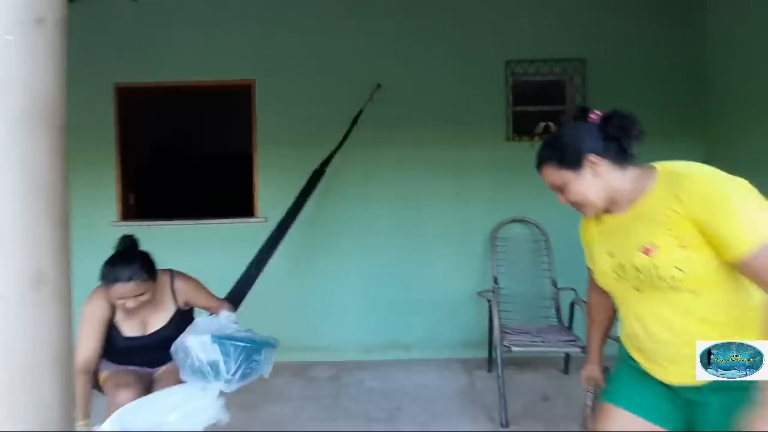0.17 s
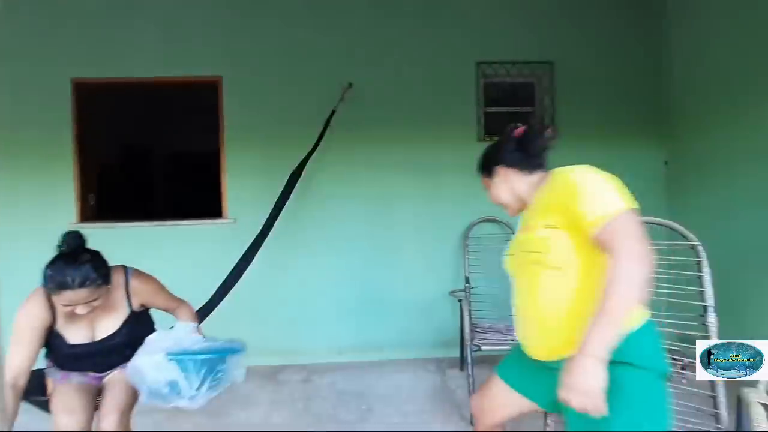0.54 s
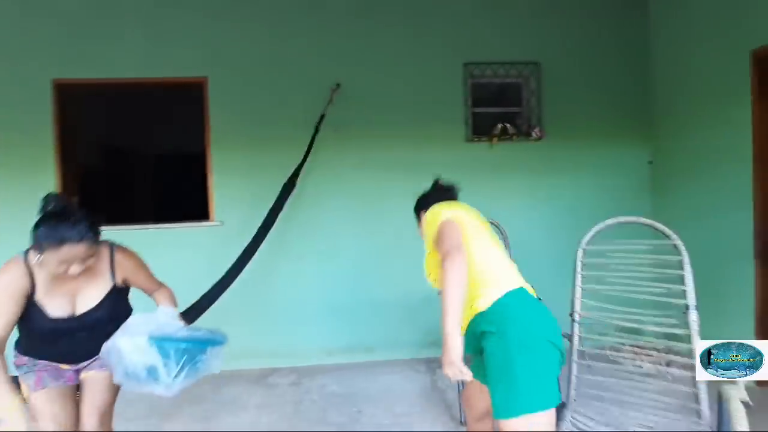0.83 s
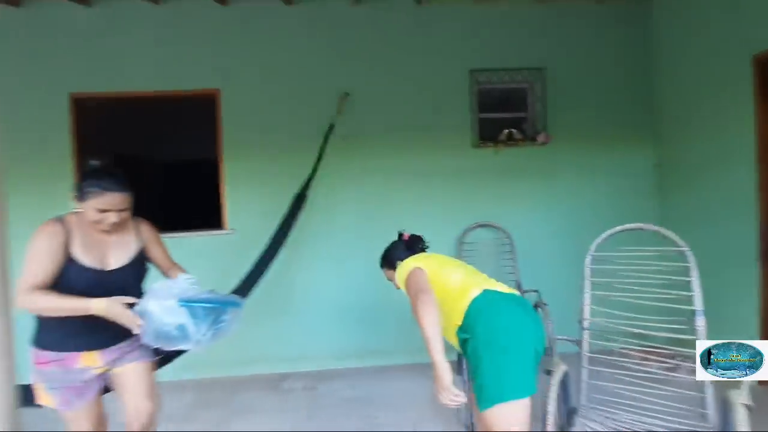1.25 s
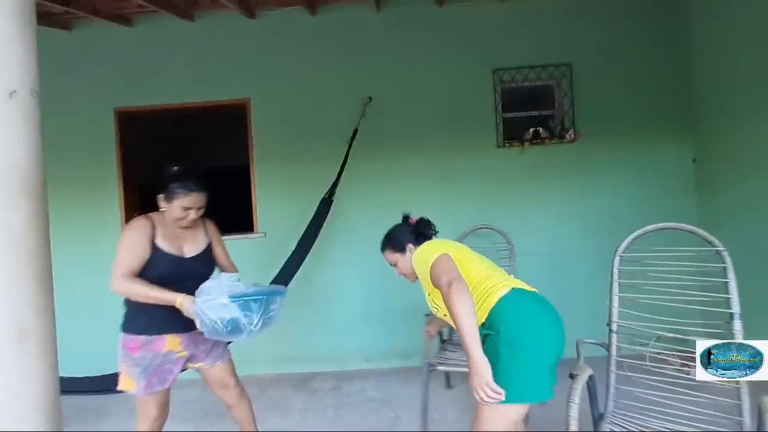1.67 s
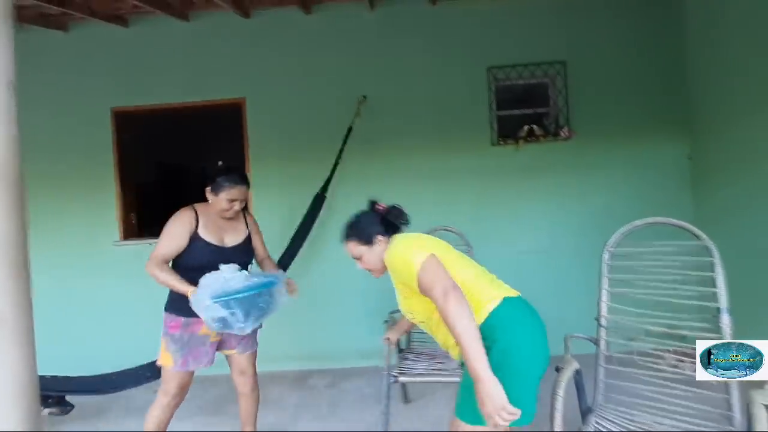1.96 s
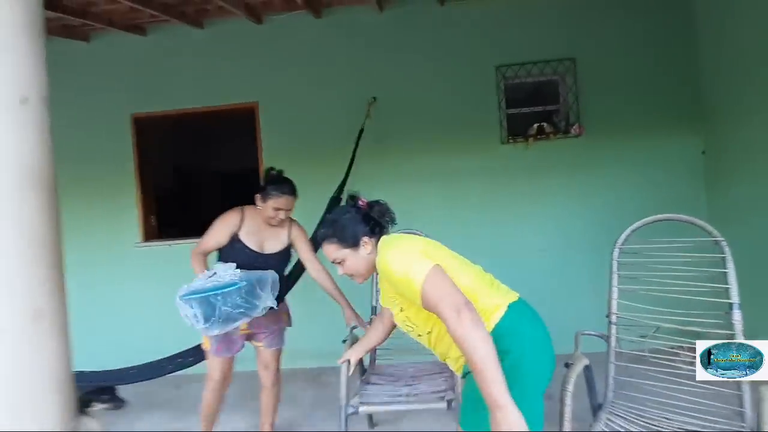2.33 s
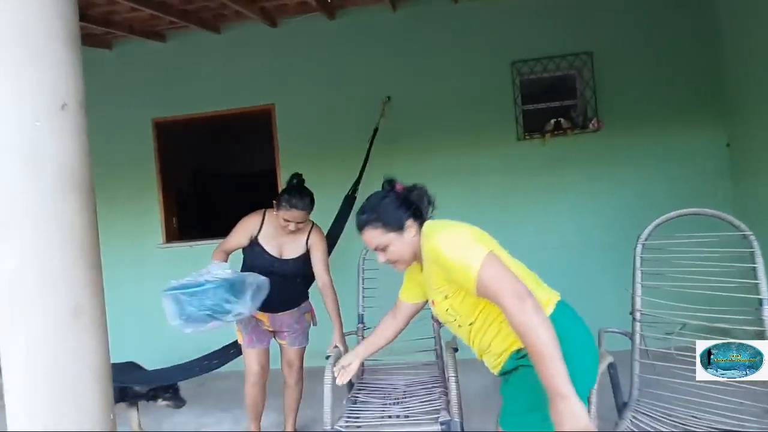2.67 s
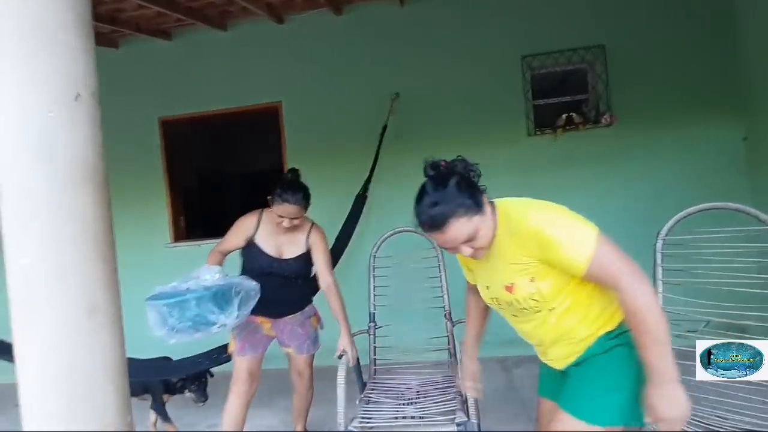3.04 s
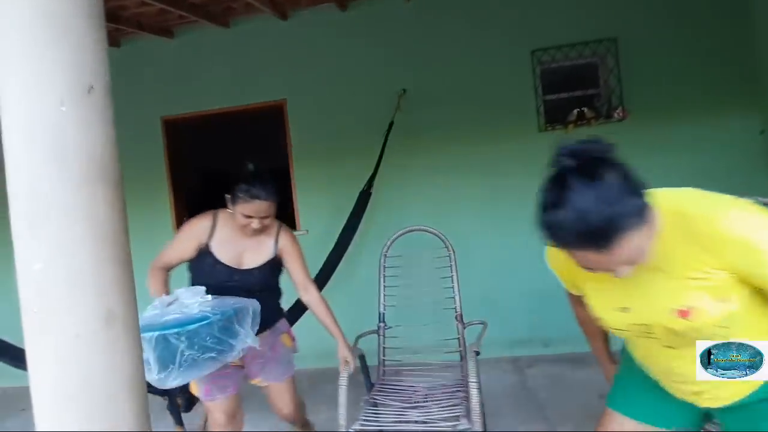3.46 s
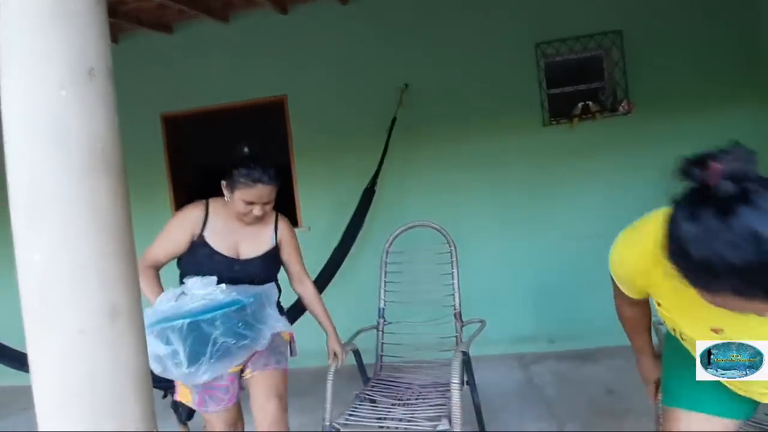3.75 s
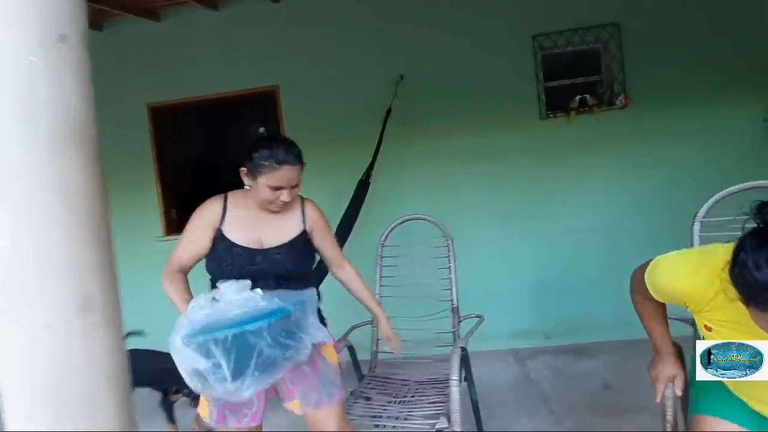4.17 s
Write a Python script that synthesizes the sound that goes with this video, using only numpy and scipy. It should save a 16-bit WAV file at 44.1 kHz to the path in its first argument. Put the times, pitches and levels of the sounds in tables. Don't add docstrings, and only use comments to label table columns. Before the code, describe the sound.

Soft chair knocks and plastic bag rustle, a long gritty metallic scrape across concrete, a final thud, then a brief weaker drag.

```python
import sys
import numpy as np
from scipy import signal
from scipy.fft import rfft, irfft, next_fast_len
from scipy.io import wavfile

SR = 44100
rng = np.random.default_rng(int(sys.argv[2]) if len(sys.argv) > 2 else 0)


def volts(x):
    e = np.asarray(x, float) / 20
    return 10 ** e


def dump_mix(stems):
    frames = np.atleast_2d(stems).T
    limited = np.clip(frames, -1, 1)
    pcm = np.round(limited * 32767).astype(np.int16)
    wavfile.write(sys.argv[1], SR, pcm)


N = 189718
GAIN_STEP = 8

# start_s, peak_db, crack_db (bright part minus peak)
KNOCKS = [(0.059, -13.5, -19), (0.069, -27.5, -11), (0.121, -16, -16), (2.5245, -16.5, -21.5),
          (2.53, -14.5, 1), (2.802, -31, -29), (2.86, -54, -16), (3.405, -41, 2), (3.769, -26.5, -11),
          (3.829, -24, -19.5), (3.848, -43, -20)]
# pitch_hz, level_db, t60_s
SEAT_MODES = [(115, -19, .12), (150, -7, 0.13), (199, -8.5, 0.073), (228.6, 2.5, .15), (276, -2, 0.11),
              (303, -3, 0.26), (372, 2, 0.084), (565, -5.5, 0.065), (789, -7, .06), (880, -9, .05),
              (1420, -20, .06)]
# start_s, length_s, pitch_hz,
# level_db
CREAKS = [(.058, .025, 2900, -38), (.118, .02, 2900, -43), (.06, .12, 210, -35), (.2, .15, 280, -47),
          (0, .05, 200, -44), (.1, .25, 130, -50), (.19, .05, 1400, -50), (.16, .1, 250, -41),
          (1.17, .1, 280, -64), (3.362, .045, 230, -58), (3.38, .62, 250, -46), (2.78, .14, 250, -50),
          (.25, .2, 2330, -54), (.23, .12, 2650, -52), (.2, .17, 3400, -56), (.915, .07, 570, -68),
          (3.35, .05, 2700, -63), (3.21, .06, 2700, -69), (3.21, .04, 1500, -71)]
# peak_s, level_db, swell_s, fade_s, dull_db (dull
RUSTLES = [(0.0, -39.5, .05, 0.031, 0.5), (.084, -48, .05, 0.17, 13), (.128, -59.5, 0.3, 0.027, -5.5),
           (.165, -62, .05, 0.17, 24), (.26, -54, 0.18, 0.19, -23), (.52, -65, 0.47, 0.15, -19),
           (.97, -61.5, 0.58, 0.16, -12.5), (1.27, -57.5, 0.044, 0.064, -4), (1.2, -72, .3, .1, -14.5),
           (2.95, -79.5, .1, 0.245, -1), (3.98, -76, .1, 0.37, -2)]
# frequency_hz, density_db (per Hz)
BAG_SPECTRUM = [(590, -30.5), (1000, -7), (1040, -7), (1480, 3), (1820, 4), (2020, 0.5), (2430, 4.5),
                (6120, -0.5), (6630, 1.5), (14900, -2.5), (15800, -10)]
# frequency_hz, density_db (per Hz)
AIR_SPECTRUM = [(40, -14.5), (110, -8.5), (280, 5), (700, -9), (1500, -21), (3000, -36), (6000, -31.5),
                (15800, -28)]
# peak_s, level_db, swell_s, fade_s
GUSTS = [(.09, -47.5, 0.068, .05), (.27, -55, .3, 0.18), (.53, -65.5, .4, .3), (.73, -59.5, .08, .3),
         (1.19, -72, .2, .04), (1.45, -56, .3, .35), (1.72, -57, 0.062, .2), (2.15, -69, .4, .2),
         (2.27, -54.5, .08, .8), (2.59, -59.5, 0.52, 0.13), (3.58, -58, 0.16, 0.23),
         (3.98, -70, 0.072, 0.23)]
# time_s, weight_db (frame rumble), speed_db (grit hiss minus rumble)
DRAGS = [
    [(1.2, -77.5, -10.5), (1.235, -59, -9), (1.285, -30.5, -23.5), (1.34, -23.5, -16.5),
     (1.65, -22.5, -8.5), (2.08, -23.5, -18.5), (2.4, -19, -14.5), (2.68, -21.5, -16), (2.96, -76, -6)],
    [(3.33, -86, -12), (3.4, -46.5, -8.5), (3.48, -36.5, -11), (3.585, -27, -16), (3.66, -30.5, -12.5),
     (3.83, -36.5, -13.5), (3.92, -68, 2.4), (4.02, -92, -9)],
]
# landing_s, lift_db, jolt_db (frame), bite_db (grit)
SKIPS = [(1.352, -1, 3.7, 8), (1.522, 1.5, -0.5, 2), (1.686, -11.5, 4, -5), (1.761, -14.5, 0.2, -9.5),
         (1.814, 3, 1, 5.5), (1.969, 7, 1.8, 11), (2.089, -2, -1.9, -2), (2.212, -0.5, -0.5, 0),
         (2.418, -4, -1.3, -4), (2.532, -1.5, -3, 2), (2.609, -1.5, 2.5, 4), (2.69, -3, -0.6, 7.9),
         (2.72, -8, 7.5, 5), (3.58, -0.5, 0, 2.5), (3.661, -8.5, -3, 1.8), (3.714, -1, -1.5, 6),
         (3.806, 0.5, 2.5, 3), (3.83, -3, 7.5, 4.5)]
# pitch_hz, width_hz, level_db
FRAME_LOW = [(202.6, 76.5, -9), (277, 63, -6.5), (344.5, 17, -8), (458, 181, -8), (473, 42, -4.5),
             (546, 110, -6), (630, 54, -3), (667, 37, -5), (805, 47, -8.5), (916, 77, -7.5),
             (1060, 130, -10), (1166, 53, -3), (1370, 160, -17), (1488, 69, -10.5), (1668, 190, -18.5)]
# pitch_hz, width_hz, level_db
FRAME_HIGH = [(2142, 34, 4.5), (2385, 110, -6.5), (2410, 32, 6.5), (2520, 160, -7), (2652, 100, 0.5),
              (3150, 290, -4), (3374, 89, -6), (4110, 98, -5.5), (4450, 160, -6.5), (4530, 86, -3),
              (4500, 50, -26), (5255, 59, -9)]
# frequency_hz, density_db (per Hz)
GRIT_SPECTRUM = [(880, -35.5), (1500, -2.5), (1580, -10), (1960, -10.5), (2100, -7), (2410, -6),
                 (4430, -11), (5180, -13.5), (8230, -11.5), (10100, -15.5), (11800, -10.5), (14900, -18),
                 (15800, -23.5)]
# peak_s, level_db, swell_s, fade_s
BOOMS = [(1.33, -50.5, 0.098, 0.089), (1.42, -52, .04, 0.058), (1.556, -31, 0.021, 0.15),
         (1.918, -36, .08, 0.08), (2.07, -41.5, 0.075, 0.13), (2.25, -38.5, .08, .25),
         (2.38, -34.5, .1, .2), (2.57, -31, 0.081, 0.19), (2.8, -47, .15, 0.053), (3.48, -43, 0.073, 0.11),
         (3.59, -40, 0.087, .08), (3.7, -42, .05, .15)]
# start_s, length_s, pitch_hz, level_db
SINGS = [(1.316, 0.0079, 1488, -41.5), (1.532, 0.015, 533, -21), (1.593, 0.089, 604, -23),
         (1.675, 0.027, 566, -22.5), (1.642, 0.026, 1170, -24.5), (1.792, 0.013, 2410, -28),
         (2.13, 0.017, 2355, -30), (2.189, 0.073, 1488, -29), (2.267, 0.03, 2360, -28.5),
         (2.372, 0.053, 1488, -21), (2.453, .06, 2410, -26), (2.622, 0.016, 1488, -30)]
# start_s, level_db
LET_GO = [
    (2.76, -67),
    (3.86, -82),
]
# pitch_hz, t60_s, level_db
FREE_TUBES = [(2071, 1.0, 0), (2078.6, 1.0, -1)]
# peak_s, level_db, swell_s, fade_s, dull_db (dull part minus level)
SHUFFLES = [
    (3.215, -70, 0.0025, 0.098, -18.5),
    (3.3, -90, .06, 0.024, -9),
    (4.07, -67, 0.044, 0.048, -13),
    (4.125, -78, 0.044, 0.019, 0),
    (4.158, -74, .004, 0.11, 5),
    (4.275, -72, 0.065, 0.11, -5),
]
# frequency_hz, density_db (per Hz)
SOLE_SPECTRUM = [(800, -34), (1300, -4), (2000, -0.5), (3300, -4.5), (4200, -13), (4900, -14), (9000, -20),
                 (15000, -29.5)]
# start_s, level_db
TICKS = [
    (4.105, -79.5),
    (4.19, -62),
    (4.275, -56),
]
# frequency_hz, likeness (-1 to 1)
ECHO_LIKENESS = [(60, 0.28), (150, 0.87), (380, 0.61), (950, 0.42), (2380, -.2), (6000, -0.38),
                 (15000, -0.34)]
# frequency_hz, tilt_db (left minus right)
STEREO_TILT = [(60, -1.5), (150, 1.5), (380, 1.5), (950, -2.5), (2380, -1.5), (5980, 1), (15000, -4)]


def rms_one(x):
    return x / np.sqrt(np.mean(x ** 2) + 1e-20)


def band(x, low_hz, high_hz):
    return signal.sosfilt(signal.butter(2, [low_hz, high_hz], "band", fs=SR, output="sos"), x)


def at_hz(points, size):
    hz = np.maximum(np.arange(size // 2 + 1) * SR / size, 1)
    point_hz, value = np.array(points).T
    return np.interp(np.log(hz), np.log(point_hz), value)


def coloured(x, spectrum):
    size = next_fast_len(N)
    shaped = rfft(x, size) * volts(at_hz(spectrum, size))
    return rms_one(irfft(shaped, size)[..., :N])


def drift(rate):
    r = np.exp(-80 * np.pi * rate / SR)
    slow = signal.lfilter([1], [1, -2 * r, r * r], rng.standard_normal(N // 40 + 2002))[2000:]
    return np.interp(np.arange(N) / 40, np.arange(len(slow)), rms_one(slow))


def grains(per_s, spread_db):
    sizes = volts(spread_db * np.minimum(rng.exponential(1, N), 5)) * rng.choice([-1, 1], N)
    return rms_one(sizes * (rng.random(N) < per_s / SR))


def resonate(x, hz, width_hz):
    r = np.exp(-np.pi * width_hz / SR)
    poles = [1, -2 * r * np.cos(2 * np.pi * hz / SR), r * r]
    return signal.lfilter([(1 - r * r) / 2, 0, (r * r - 1) / 2], poles, x + 1e-18)


def resonate_twice(x, hz, width_hz):
    return resonate(resonate(x, hz, width_hz), hz, width_hz)


def ring(blows, hz, t60_s):
    width_hz = np.log(1000) / np.pi / t60_s
    return resonate(blows, hz, width_hz) * SR / width_hz / np.pi


def die_away(clicks, t60_s):
    return signal.lfilter([1], [1, -volts(-60 / (t60_s * SR))], clicks)


def strikes(rows):
    out = np.zeros(N)
    for s, db in rows:
        out[round(s * SR)] = volts(db)
    return out


def swells(rows):
    t = np.arange(0, N, GAIN_STEP) / SR
    s, db, swell_s, fade_s = np.array(rows).T[:4, :, None]
    drop_db = 20 * np.maximum((s - t) / swell_s, (t - s) / fade_s)
    return np.repeat(volts(db - drop_db), GAIN_STEP, axis=1)[:, :N]


def knocks():
    contact_hz = 1270
    held_from_s, held_db, held_under_hz = 1, -12, 400
    s, peak_db, crack_db = np.transpose(KNOCKS)
    at = np.round((s + 0.0014) * SR).astype(int)
    uneven_db = rng.normal(0, 2.8, (len(s), len(SEAT_MODES)))
    blows, cracks = np.zeros((2, N))
    blows[at] = volts(peak_db)
    cracks[at] = volts(peak_db + crack_db - 3.0)
    body = volts(-1.5) * ring(blows, 570, 0.0091)
    for k, (hz, db, t60_s) in enumerate(SEAT_MODES):
        grip_db = held_db * (s > held_from_s) * (hz < held_under_hz)
        strength = np.ones(N)
        strength[at] = volts(db - 19.5 + uneven_db[:, k] + grip_db)
        body += ring(blows * strength, hz, t60_s)
    cords = die_away(blows, 0.2) * rms_one(band(rng.standard_normal(N), 180, 1000))
    dulling = signal.butter(4, contact_hz, fs=SR, output="sos")
    soft = signal.sosfilt(dulling, body + volts(-13.5) * cords)
    crack = die_away(cracks, 0.07) * coloured(rng.standard_normal(N), GRIT_SPECTRUM)
    return -band(soft, 110, 6000) + crack


def creaks():
    t, white, out = np.arange(N) / SR, rng.standard_normal(N), 0
    for s, length_s, hz, db in CREAKS:
        swell = np.sin(np.pi * np.clip((t - s) / length_s, 0, 1))
        out = out + volts(db) * swell * rms_one(resonate_twice(white, hz, 60 + 0.07 * hz))
    return out


def rustle(rows, spectrum, per_s):
    gains = swells(rows)
    crisp = coloured(grains(per_s, spread_db=2.0), spectrum) * gains.sum(axis=0) * volts(6.5)
    dull = rms_one(band(rng.standard_normal(N), 220, 1200))
    dull_db = np.array(rows)[:, 4] - 2.0
    return crisp + dull * (volts(dull_db) @ gains)


def outdoors():
    air_db, insect_db, calm_db = -80.5, -69.5, -89
    mix = [[1, 0.45], [1, -0.41]]
    air = coloured(mix @ rng.standard_normal((2, N)), AIR_SPECTRUM) * volts(air_db)
    buzz = rng.standard_normal((2, N)) * volts(2.3 * drift(60))
    insects = rms_one(resonate_twice(buzz, hz=6700, width_hz=480)) * volts(insect_db)
    common, own = rng.standard_normal(N), rng.standard_normal((2, N))
    wind = rms_one(band(common + 0.2 * own, 55, 110))
    wind_gain = volts(calm_db) + volts(-7.0) * swells(GUSTS).sum(axis=0)
    return air + insects + wind * wind_gain


def drag_levels():
    t, out = np.arange(N) / SR, 0
    for rows in DRAGS:
        s, *columns = np.transpose(rows)
        out = out + np.array([np.interp(t, s, c, 0, 0) for c in columns])
    out[0][out[0] == 0] = -150
    return out


def skips():
    lift_s, jolt_s, bite_s, frame_lift_share = 0.033, 0.059, 0.034, 0.44
    s, lift_db, jolt_db, bite_db = np.array(SKIPS).T[:, :, None]
    since = np.arange(0, N, GAIN_STEP) / SR - s
    before, after = since < 0, since >= 0
    lift = np.sum(lift_db * np.exp(-abs(since) / lift_s) * before, axis=0)
    jolt = np.sum(jolt_db * np.exp(-abs(since) / jolt_s) * after, axis=0)
    bite = np.sum(bite_db * np.exp(-abs(since) / bite_s) * after, axis=0)
    return np.repeat([frame_lift_share * lift + jolt, lift + bite], GAIN_STEP, axis=1)[:, :N]


def frame(grit, gain, modes, patchy_db, rate):
    total, steady_total = 0, 0
    for k, (hz, width_hz, db) in enumerate(modes):
        push = (-1) ** k * volts(db + patchy_db * drift(rate)) * grit
        steady_total = steady_total + resonate(push, hz, width_hz)
        total = total + resonate(push * gain, hz, width_hz)
    return total / np.std(steady_total)


def drags():
    ring_over_hiss_db, ring_bite_share, thrum_db = 7, 0.19, -34
    weight_db, speed_db = drag_levels()
    jolt_db, bite_db = skips()
    rumble_db = weight_db + jolt_db
    hiss_db = weight_db + speed_db + bite_db
    ring_db = weight_db + speed_db + ring_over_hiss_db + ring_bite_share * bite_db
    boom = volts(rumble_db + thrum_db) + swells(BOOMS).sum(axis=0)
    judder = volts(1.0 * drift(42))
    grit = grains(per_s=4000.0, spread_db=3.0) * judder
    low = frame(grit, volts(rumble_db - 2.5), FRAME_LOW, patchy_db=1.6, rate=16.0)
    high = frame(grit, volts(ring_db - 3.0), FRAME_HIGH, patchy_db=1.6, rate=18.0)
    rasp = rms_one(band(grit, 200, 1600)) * volts(rumble_db - 10.0)
    thrum = rms_one(resonate_twice(grit, hz=132, width_hz=60)) * boom * volts(-8.0)
    scratch = volts(2.1 * drift(25))
    fine_grit = coloured(grains(per_s=12000.0, spread_db=2.5), GRIT_SPECTRUM)
    hiss = fine_grit * scratch * volts(hiss_db + 9.0)
    return low + high + rasp + thrum + hiss


def sings():
    t, out = np.arange(N) / SR, np.zeros(N)
    wobble = np.cumsum(3.6 * drift(39)) / SR
    flutter = volts(0.42 * drift(40))
    for s, length_s, hz, db in SINGS:
        swell = np.sin(np.pi * np.clip((t - s) / length_s, 0, 1)) ** 2
        out += volts(db + 0.5) * swell * np.sin(2 * np.pi * (hz * t + wobble))
    return out * flutter


def free_tubes():
    let_go = strikes(LET_GO)
    tubes = sum(volts(db) * ring(let_go, hz, t60_s) for hz, t60_s, db in FREE_TUBES)
    return tubes * np.array([[1.0], [-1.0]])


def ticks():
    bright = rms_one(band(rng.standard_normal((2, N)), 6000, 15000))
    return die_away(strikes(TICKS), 0.046) * bright


def porch(direct, sent):
    porch_t60_s, move_s = 0.15, 0.08
    yard_t60_s, yard_db, yard_cut_hz = 0.55, -26, 1300
    hop, size = round(move_s * SR), 2 ** 15
    sign = np.array([[1], [-1]])
    t = np.arange(SR // 2) / SR
    near = volts(-60 * t / porch_t60_s) * (t > 0.003)
    far = volts(yard_db - 60 * t / yard_t60_s)
    dull = signal.butter(2, yard_cut_hz, fs=SR, output="sos")
    alike = np.clip(1.985 * at_hz(ECHO_LIKENESS, size) - 0.5, -0.5, 1)
    tilt = volts(sign * at_hz(STEREO_TILT, size) / 2)
    out = np.zeros((2, N + hop + size))
    window = np.hanning(2 * hop + 1)[:-1]
    direct, sent = [np.pad(x, (hop, 2 * hop)) for x in (direct, sent)]
    for i in range(0, N + hop, hop):
        white = rng.standard_normal((2, len(t)))
        tail = white * near + signal.sosfilt(dull, white * far)
        mid, side = rfft(tail / np.linalg.norm(near), size)
        echo = (np.sqrt(1 + alike) * mid + sign * np.sqrt(1 - alike) * side) / np.sqrt(2)
        pieces = [direct[i:i + 2 * hop] * window, sent[i:i + 2 * hop] * window]
        straight, bounced = rfft(pieces, size)
        out[:, i:i + size] += irfft((straight + bounced * echo) * tilt, size)
    return out[:, hop:hop + N]


def scene():
    drag_echo_db, knock_echo_db = 3.5, 0
    spread = drags() + rustle(RUSTLES, BAG_SPECTRUM, per_s=8100.0) + creaks()
    spread = spread / np.sqrt(1 + volts(2 * drag_echo_db))
    close = knocks() + sings() + rustle(SHUFFLES, SOLE_SPECTRUM, per_s=11000.0)
    heard = porch(spread + close, volts(drag_echo_db) * spread + volts(knock_echo_db) * close)
    return heard + free_tubes() + ticks() + outdoors()


def top_cut(x):
    return signal.sosfilt(signal.butter(12, 15910, fs=SR, output="sos"), x)


def record(dry):
    hiss_db, top_hz = -95, 15950
    noisy = dry + volts(hiss_db) * rng.standard_normal(dry.shape)
    dipped = noisy - 0.62 * resonate(noisy, hz=9990, width_hz=1700)
    cut = signal.sosfilt(signal.cheby2(16, 40, top_hz, fs=SR, output="sos"), dipped)
    return top_cut(cut)


dry = scene()
out = record(dry)
dump_mix(out)
```